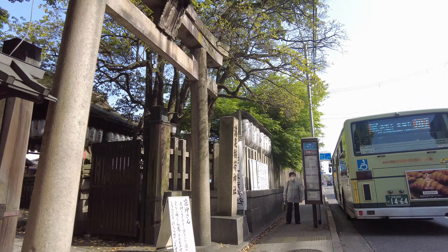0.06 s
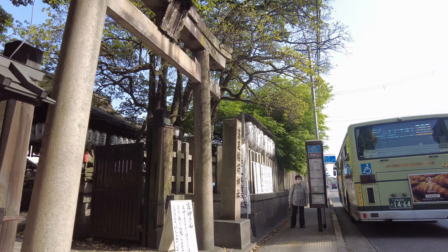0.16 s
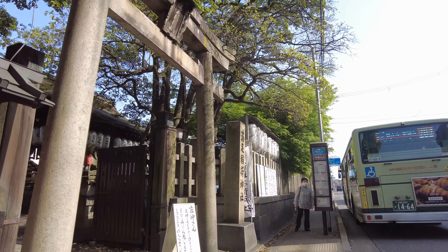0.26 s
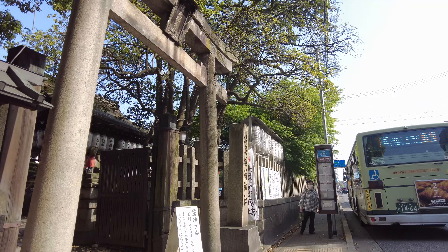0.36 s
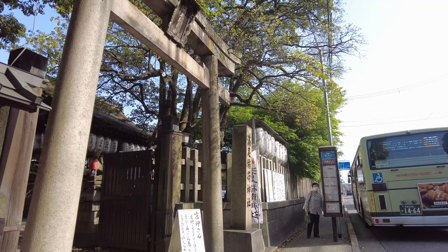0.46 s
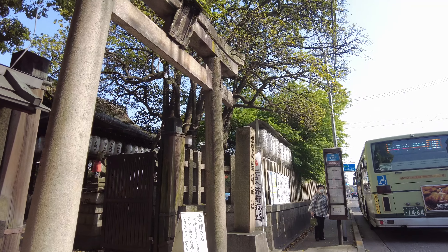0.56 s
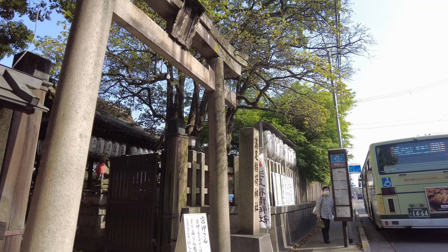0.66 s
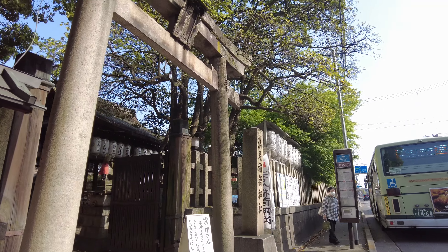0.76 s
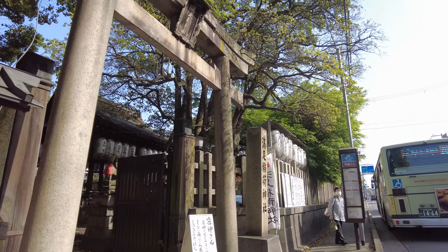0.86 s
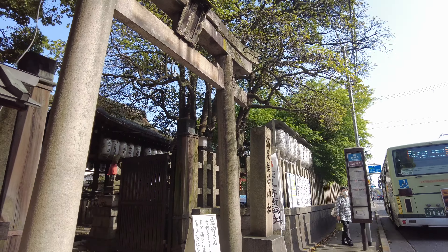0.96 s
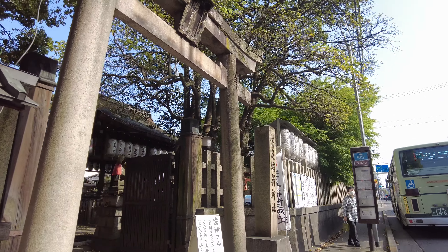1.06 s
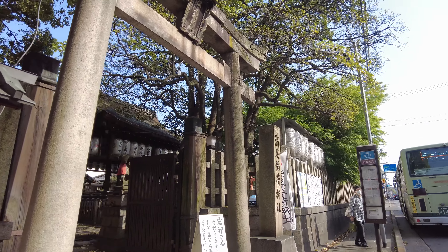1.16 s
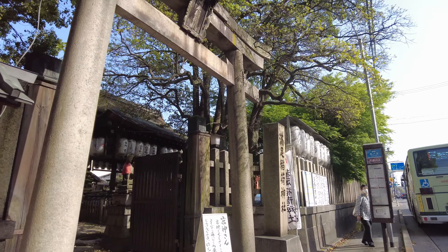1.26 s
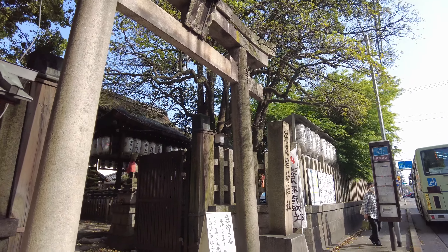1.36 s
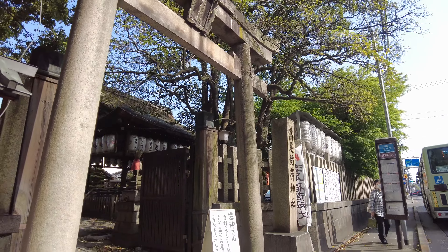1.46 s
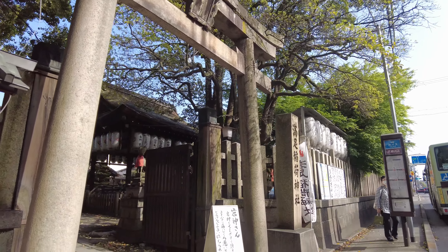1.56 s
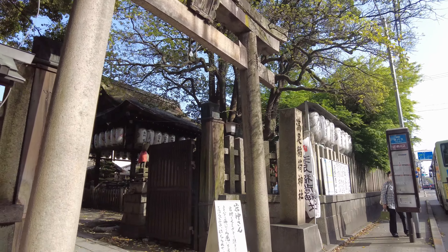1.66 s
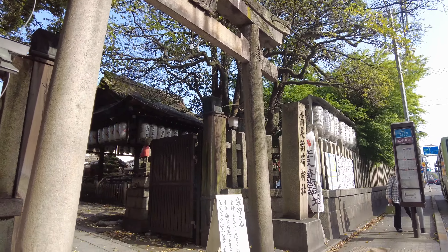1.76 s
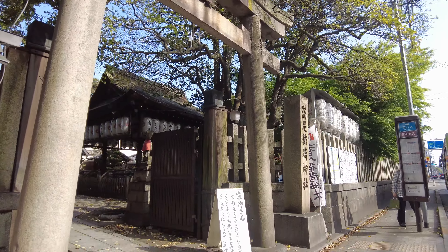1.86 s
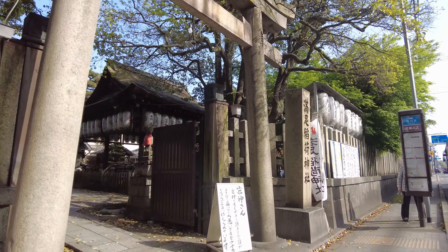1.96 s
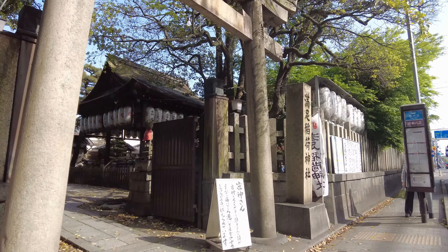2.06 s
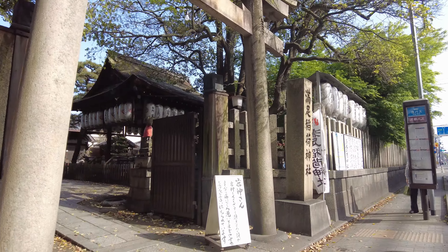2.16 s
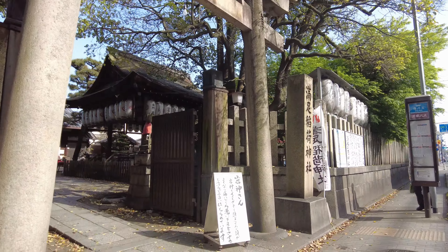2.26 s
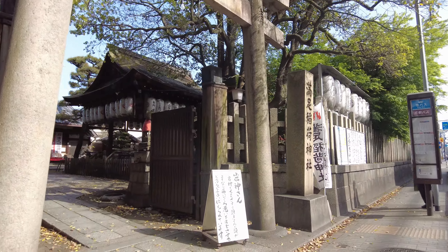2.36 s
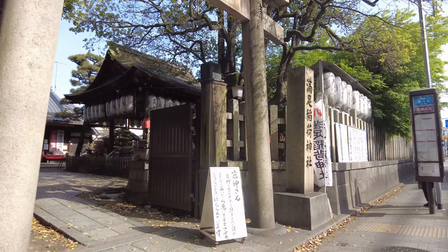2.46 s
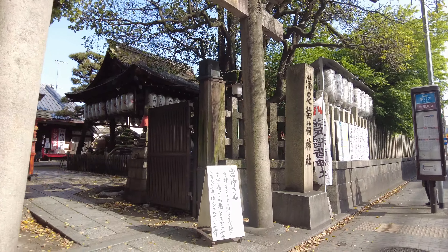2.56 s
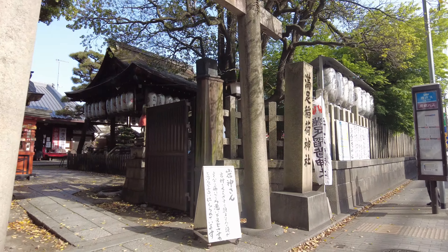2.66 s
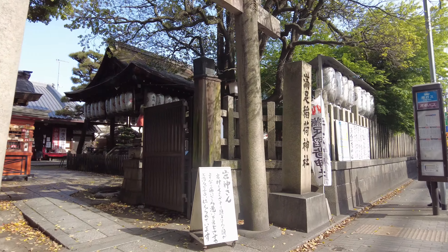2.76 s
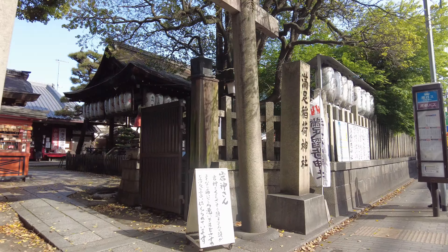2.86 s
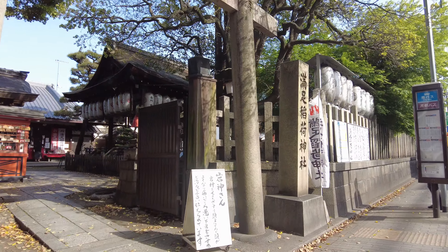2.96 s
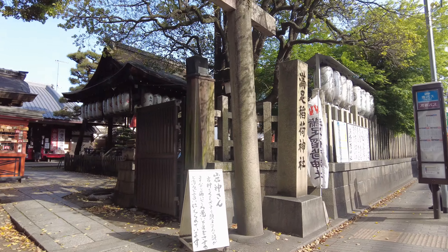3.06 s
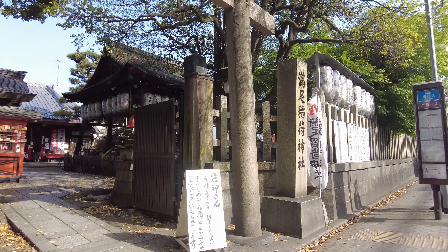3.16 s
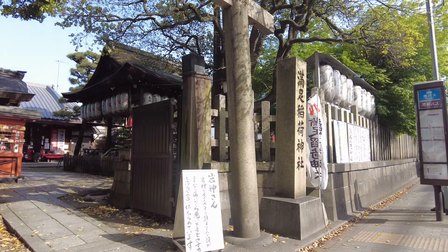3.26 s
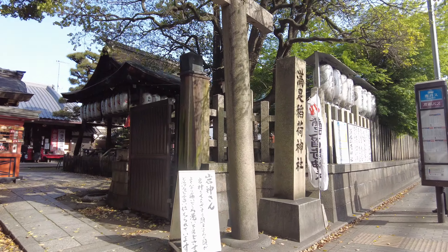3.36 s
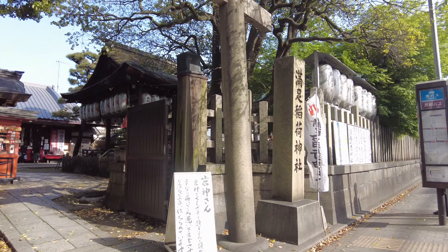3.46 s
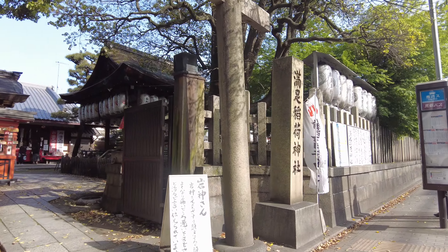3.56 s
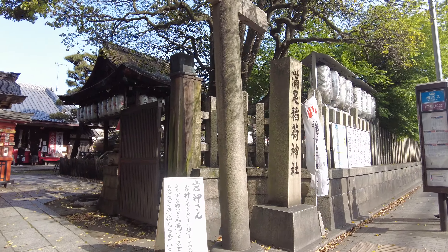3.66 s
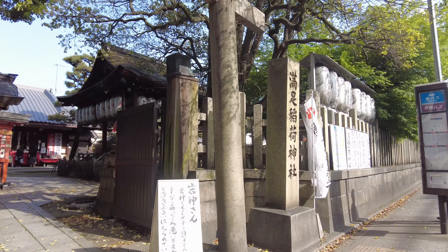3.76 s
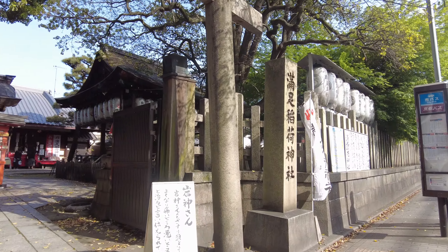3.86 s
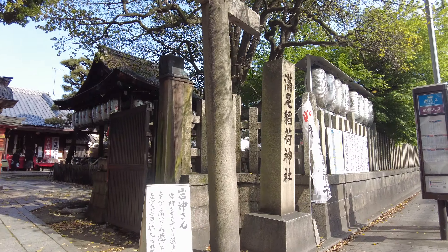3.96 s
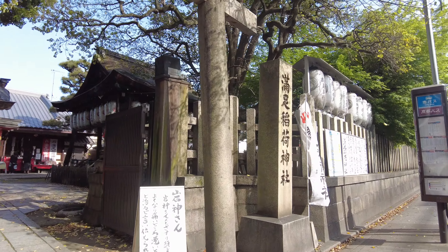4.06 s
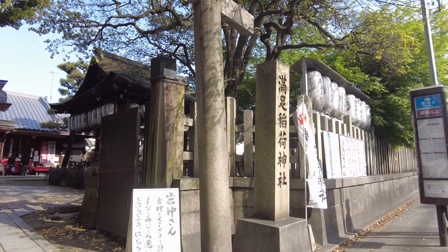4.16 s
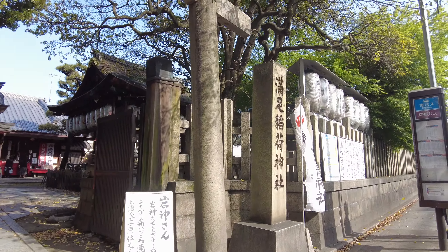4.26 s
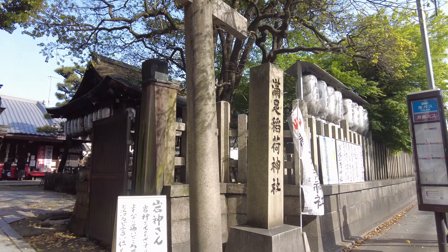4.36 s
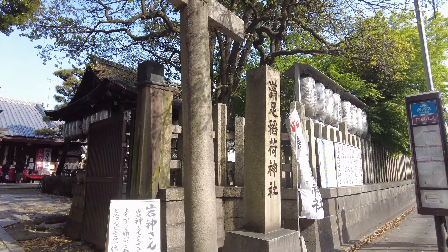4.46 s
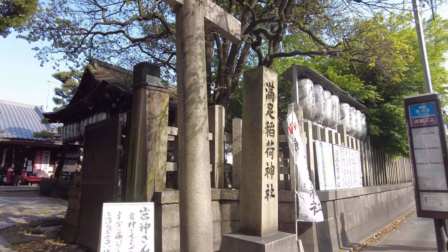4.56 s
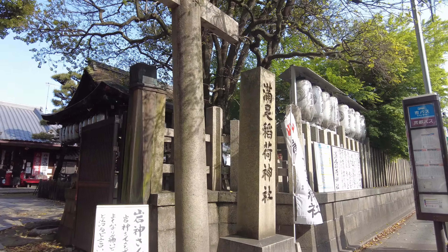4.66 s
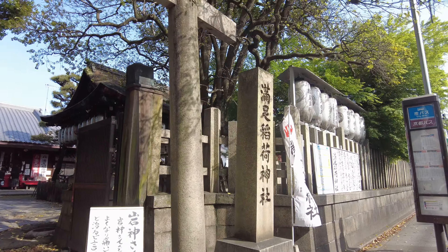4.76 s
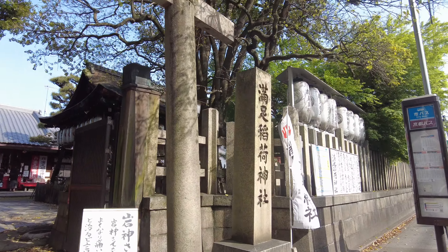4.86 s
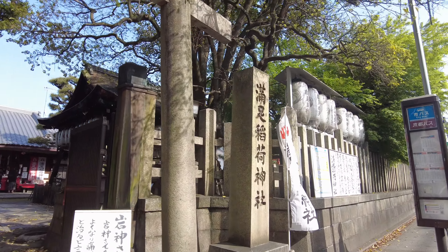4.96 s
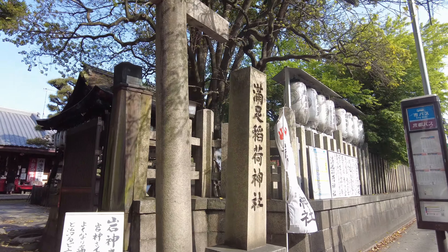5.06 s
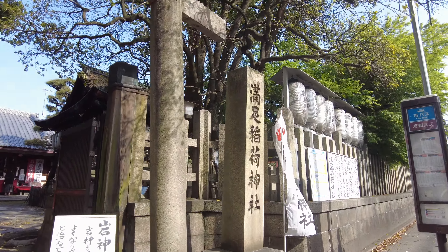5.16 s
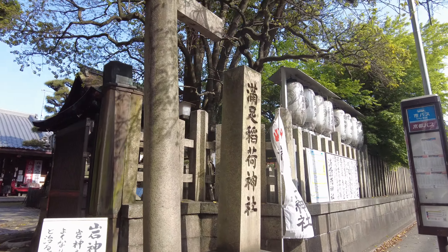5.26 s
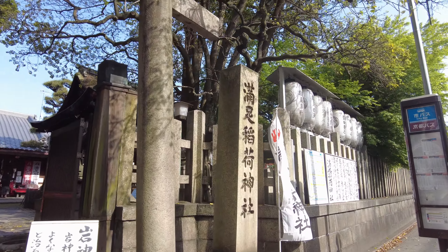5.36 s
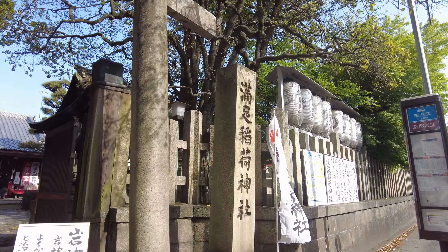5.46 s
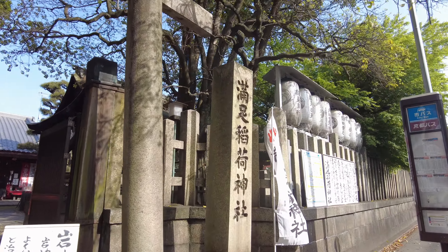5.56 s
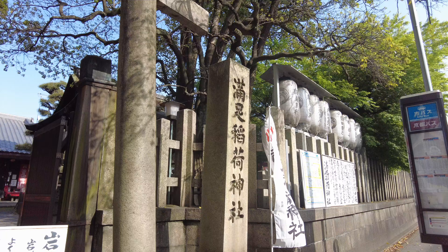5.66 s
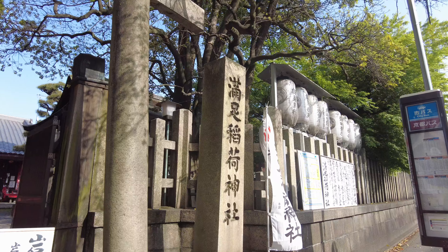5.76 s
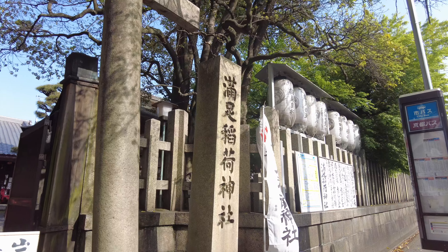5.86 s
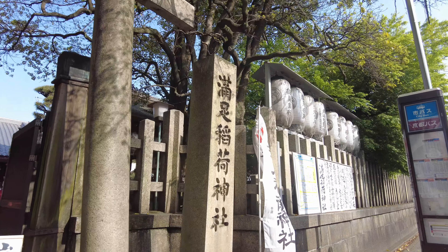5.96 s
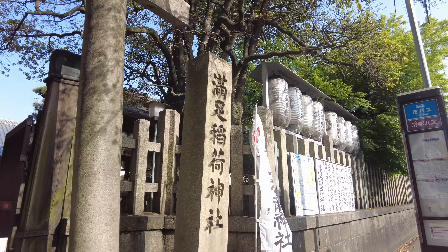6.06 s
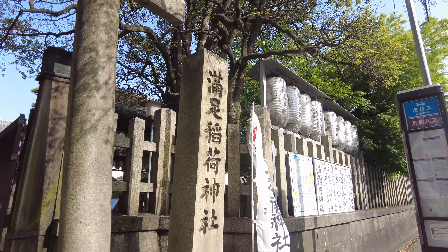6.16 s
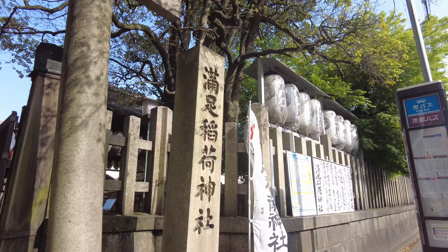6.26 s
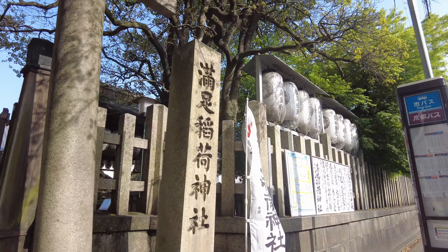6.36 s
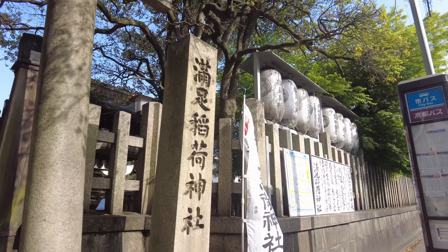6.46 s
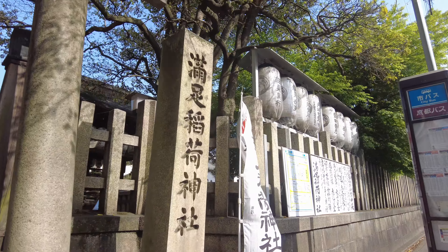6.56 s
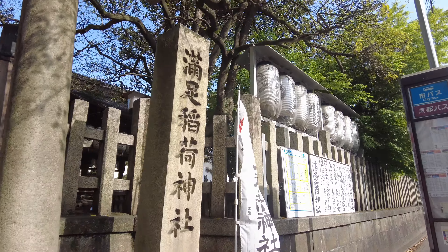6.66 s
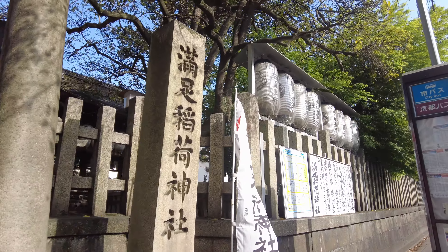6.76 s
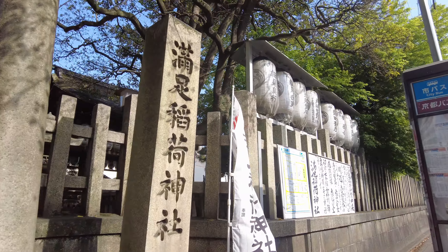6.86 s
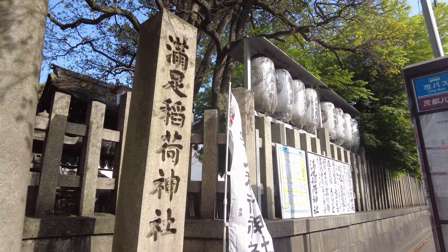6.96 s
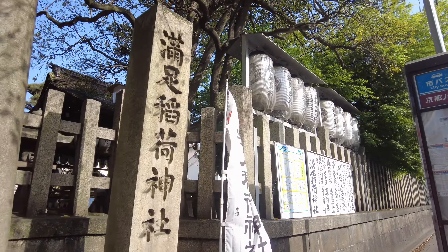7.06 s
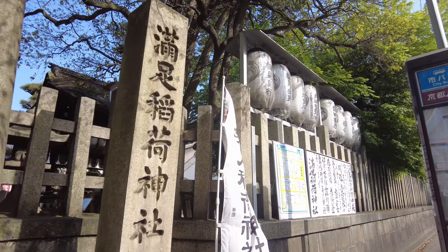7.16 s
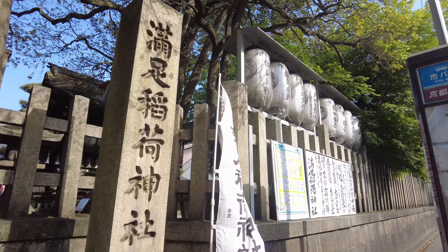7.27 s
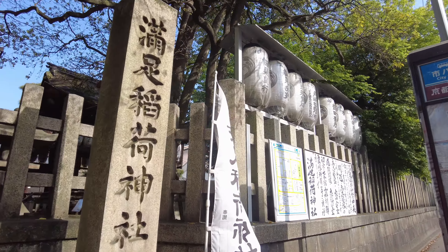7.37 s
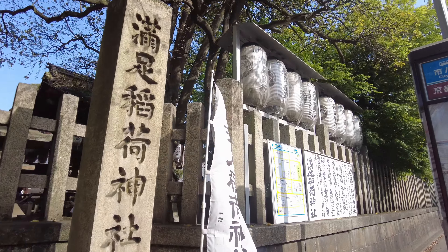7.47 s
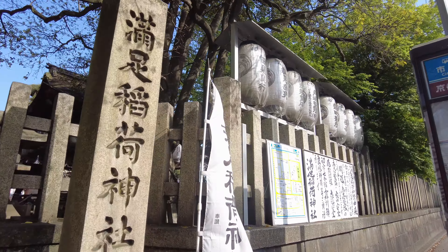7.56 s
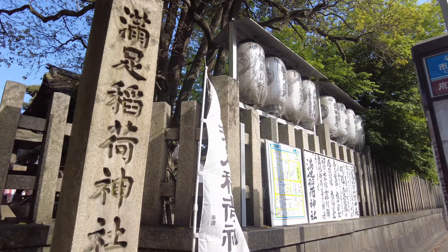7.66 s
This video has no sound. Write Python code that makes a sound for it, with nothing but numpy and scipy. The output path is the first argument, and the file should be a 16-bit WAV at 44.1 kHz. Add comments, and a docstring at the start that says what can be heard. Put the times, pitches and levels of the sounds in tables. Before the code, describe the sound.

A handheld stereo microphone beside a street hears a heavy bus engine leave: low boom, rattling panels and airy fan noise, loudest in the first three seconds. The pitch climbs, drops at the gear change, and further pulls grow more distant. Passing tyres and town hum lie beneath. Early wind puffs bump the microphone; late on, the sound narrows to mono, with small dry ticks nearby.

```python
"""City bus leaving a stop

A diesel bus pulls away, changes gear at about two seconds and recedes up the street.
Firing-rate harmonics boom in the exhaust at each pull; noise bursts at each firing drive body and bay resonances.
Shaped noise makes the fan's rush, the traffic, the puffs of wind, the gear-change hiss and late ticks close by.
After five seconds the stereo picture narrows to mono."""
import sys
import numpy as np
from scipy import signal
from scipy.fft import rfft, irfft
from scipy.io import wavfile
from scipy.ndimage import uniform_filter1d, map_coordinates

SR = 44100
rng = np.random.default_rng(int(sys.argv[2]) if len(sys.argv) > 2 else 0)


def dump_mix(stems):
    """Bounce the given channels to the path in sys.argv[1] as a 16-bit WAV at rate SR."""
    frames = np.atleast_2d(stems).T  # one column per channel
    limited = np.clip(frames, -1, 1)  # hard clip at full scale
    pcm = np.round(limited * 32767).astype(np.int16)
    wavfile.write(sys.argv[1], SR, pcm)


N = 340452
T = np.arange(N) / SR
FREQ = np.maximum(np.arange(N // 2 + 1) * SR / N, 1)
OPPOSED = np.array([[1], [-1]])  # signs of a difference signal in left and right


def undb(db):
    """Logarithmic level: decibels to amplitude gain."""
    return 10 ** (np.asarray(db) / 20)


def curves(table):
    """Linear interpolation in time: each column of a timed table, one value a sample."""
    s, *columns = np.transpose(table)
    return [np.interp(T, s, c) for c in columns]


def by_frequency(table):
    """Interpolation over log frequency: each column of a spectrum table, one value a bin."""
    hz, *columns = np.transpose(table)
    return [np.interp(np.log(FREQ), np.log(hz), c) for c in columns]


def filtered(x, response):
    """Linear filtering: multiply a sound's spectrum by a frequency response."""
    return irfft(rfft(x) * response, N)


def resonance(hz, width_hz):
    """Damped oscillator: complex response with gain 1 at its centre."""
    return 1 / (1 + 1j * (FREQ ** 2 - hz ** 2) / (FREQ * width_hz))


def ring(x, modes):
    """Modal superposition: resonances add in power; each gain is about half one half-width off centre."""
    power = sum(undb(db) ** 2 * abs(resonance(hz, 2 * half_width)) ** 4 for hz, half_width, db in modes)
    return filtered(x, np.sqrt(power))


def noise():
    """Incoherence: two unrelated white noises."""
    return rng.standard_normal((2, N))


def walk(rate):
    """Slow random fluctuation: levels held 1 / rate s and smoothed twice; spread near 1."""
    hold = max(int(SR / rate), 1)
    steps = np.repeat(rng.standard_normal(N // hold + 1), hold)
    return 1.8 * uniform_filter1d(uniform_filter1d(steps, hold), hold)[:N]


def level(x, db):
    """Root-mean-square scaling: set a steady sound to a level."""
    return x * undb(db) / np.sqrt(np.mean(x ** 2))


def step(s, length_s):
    """Sigmoid transition: a smooth rise from 0 to 1 around a moment."""
    return (1 + np.tanh((T - s) / length_s)) / 2


def surges(rows, attack_s):
    """Envelope shaping: sounds rise quickly, swell or sag while held and decay exponentially."""
    gain = np.zeros(N)
    for start, end, db, swell_db, release_s in rows:
        attack = np.clip((T - start) / attack_s, 0, 1)
        held = undb(db + swell_db * (np.clip(T, start, end) - start))
        gain = np.maximum(gain, attack * held * np.exp(-np.maximum(T - end, 0) / release_s))
    return gain


def passes(rows):
    """Inverse-square swell in time: vehicles grow and fade, their powers adding."""
    return np.sqrt(sum((undb(db) / (1 + ((T - s) / half_s) ** 2)) ** 2 for s, db, half_s in rows))


# engine speed: start_s, firing_rate_hz
ENGINE_SPEED = [(0, 71.84), (.25, 71.63), (.9, 76.17), (1.55, 79.93), (1.95, 80.66), (2.2, 73.96),
                (2.85, 71), (3.4, 68.96), (4.35, 69.85), (4.7, 67.62), (4.95, 64.35), (5.6, 64.13),
                (5.9, 68.2), (7.72, 68.65)]


def crankshaft():
    """Phase accumulation: firings counted since the start; the speed trembles a little."""
    return np.cumsum(curves(ENGINE_SPEED)[0] * (1 + .004 * walk(20))) / SR


# how hard the engine works: start_s, load (0-1)
ENGINE_LOAD = [(0, 0.44), (.13, 0.08), (.55, 0.23), (.8, 0.42), (1.08, 0.55), (1.35, 0.4), (1.6, 0.35),
               (1.9, 0.6), (2.2, 0.38), (3.2, 0.39), (3.8, 0.57), (3.96, 0.81), (4.55, 0.94), (4.9, 0.73),
               (5.02, 0.45), (5.5, 0.54), (7.72, 0.4)]
CRUISE_HZ = 73.4  # firing rate at which the parts' speed term is zero


def loaded(part_db):
    """Source strength: a part's level in dB changes with the engine's load and speed."""
    idle_db, rise_db, db_per_hz = part_db
    return idle_db + rise_db * curves(ENGINE_LOAD)[0] + db_per_hz * (curves(ENGINE_SPEED)[0] - CRUISE_HZ)


START_M, ROAD_M_S, ACCEL_M_S2 = 6, 2.69, 0.73  # distance, speed and acceleration of the receding bus
SCREEN_S, SCREEN_LENGTH_S, SCREEN_DB, SCREEN_DB_PER_S = 5.49, 0.31, -5, -2


def nearness():
    """Inverse-distance law: gain relative to the start; a wall along the pavement then screens ever more."""
    distance_m = START_M + ROAD_M_S * T + ACCEL_M_S2 * T ** 2 / 2
    screen_db = SCREEN_DB * step(SCREEN_S, SCREEN_LENGTH_S) + SCREEN_DB_PER_S * np.maximum(T - SCREEN_S, 0)
    return START_M / distance_m * undb(screen_db)


SHIFT_S, SHIFT_LENGTH_S = 1.86, 0.18


def first_gear():
    """Gear engagement: 1 while the bus lugs in first gear, falling smoothly to 0 at the change."""
    return 1 - step(SHIFT_S, SHIFT_LENGTH_S)


def firings(turns, decay=.35, steady=.5, scatter_db=2.5):
    """Pulsed excitation: a decaying burst of gas noise at each firing, every one of its own strength."""
    count = turns.astype(int)
    strength = undb(scatter_db * rng.standard_normal(count[-1] + 1))[count]
    return noise() * (steady + strength * np.exp(-(turns % 1) / decay))


def tone(turns, overtones, waver_db=.5):
    """Harmonic synthesis: a note of rms 1 whose overtones waver in strength and phase."""
    angle = 2 * np.pi * turns
    out = np.cos(angle) * undb(waver_db * walk(24.68))
    for multiple, db in overtones:
        out = out + undb(db + 1.7 * walk(4.8)) * np.cos(multiple * angle + .5 * walk(8.2))
    return level(out, 0)


# lines of unequal cylinders, sweeping through the body's resonances: pitch_hz, line_level_db (relative)
CYLINDER_SPECTRUM = [(24, -2), (48, -7), (61, 1), (80, -6), (98, 1), (135, -3.5), (165, -5), (205, -8.5),
                     (258, -7), (292, -5.5), (315, -12.5), (360, -16.5), (400, -37)]
# all the lines together: unloaded_level_db, full_load_rise_db, speed_rise_db_per_hz
CYLINDER_STRENGTH = (-24, 0.5, 0)
CYLINDERS = 6  # firings in an engine cycle


def cylinders(turns, count=32, waver_db=2.0, drift=0.33):
    """Subharmonic lines: unequal cylinders lope at multiples of the engine cycle, slowly wavering."""
    hz, db = np.transpose(CYLINDER_SPECTRUM)
    cycle_hz = curves(ENGINE_SPEED)[0] / CYLINDERS
    out = np.zeros(N)
    for k in range(2, count):
        if k != CYLINDERS:  # the firing note itself belongs to the exhaust
            line_db = np.interp(k * cycle_hz, hz, db) + waver_db * walk(3.09)
            phase = 2 * np.pi * (k * turns / CYLINDERS + rng.random()) + drift * walk(4.02)
            out += undb(line_db) * np.cos(phase)
    return level(out, loaded(CYLINDER_STRENGTH))


# the road swings to the right: start_s, left_channel_lag_s, exhaust_left_minus_right_db
ROAD_BEARING = [(0, 0.000021, -0.9), (1.2, 0.00011, -2.2), (2.1, 0.000099, 0.5), (5.3, 0.000088, 0.5)]
# the exhaust note above its fundamental: multiple of the firing rate, level_db
NOTE_OVERTONES = [(2, -34), (3, -37.5), (4, -38), (5, -36.5)]
# the throb above its fundamental: multiple of half the firing rate, level_db
HALF_RATE_OVERTONES = [(3, -11.5), (4, -8), (6, -18.5)]
# pulls on the throttle, at the starting distance: start_s, end_s, level_db, swell_db_per_s, release_s
THROTTLE_PULLS = [(-.1, .95, -15, -0.3, 0.34), (.96, 1.68, -13.5, 7.5, 0.22), (1.7, 2.0, -10, -2, 0.11),
                  (2.19, 2.88, -8.5, 0.5, 0.21), (3.46, 4.42, -13, 3.5, 0.34), (4.91, 5.08, -9, 0, 0.047),
                  (5.1, 5.4, -15, -5, 0.56), (5.96, 7.0, -12.5, -2.5, .12)]
# throb and loose rumble: unloaded_level_db, full_load_rise_db, speed_rise_db_per_hz
RUMBLE_STRENGTH = (-25.5, 3.5, -0.85)
PULL_ATTACK_S, COAST_DB = 0.085, -24.5  # the note's lowest level between pulls, before distance
LUG_RUMBLE_DB = 5.5  # extra rumble in first gear


def exhaust(turns):
    """Low-order pulsation: firing note, half-rate throb, cylinder lope and loose rumble, nearly alike in L and R."""
    near = nearness()
    pan_db = curves(ROAD_BEARING)[1]
    boom = np.maximum(surges(THROTTLE_PULLS, PULL_ATTACK_S), undb(COAST_DB))
    waver = undb(0.083 * walk(9.1) / near)  # stronger from afar
    note = tone(turns, NOTE_OVERTONES, waver_db=0.04) * boom * waver
    throb = tone(turns / 2, HALF_RATE_OVERTONES, waver_db=3.0)
    mid, side = level(ring(noise(), [(30.2, 17, -6.0), (52, 24, -5.5)]), 0)
    loose = mid + undb(-19) * side * OPPOSED
    lope = np.clip(near, 0, 1)  # the throb blurs into loose rumble with distance
    rumble_db = loaded(RUMBLE_STRENGTH) + LUG_RUMBLE_DB * first_gear()
    deep = (np.sqrt(lope) * throb + np.sqrt(1 - lope) * loose) * undb(rumble_db)
    return (note + deep + cylinders(turns)) * near * undb(np.array([pan_db, -pan_db]) / 2)


# body panels and exhaust pipe: pitch_hz, half_width_hz, level_db (relative)
BODY_MODES = [(107, 82, 6.5), (137, 12, -4), (221, 160, -8.5), (321, 42, -19)]
# engine block and bay: pitch_hz, half_width_hz, level_db (relative)
BAY_MODES = [(1330, 680, -5.5), (1584, 420, -1.5), (2600, 760, -10.5)]
# broad roar: pitch_hz, half_width_hz, level_db (relative)
ROAR_MODES = [(810, 220, -3.5), (1058, 294, 0.5)]
# strengths at the starting distance: unloaded_level_db, full_load_rise_db, speed_rise_db_per_hz
DRONE_STRENGTH = (-28, 3.5, 0)
CLATTER_STRENGTH = (-38, 10.5, 0.03)
GROWL_STRENGTH = (-45, 12, -0.4)
ROAR_STRENGTH = (-34.5, 12, 0)
# panels buzzing as the engine pulls: start_s, end_s, level_db, swell_db_per_s, release_s
PANEL_BUZZES = [(-.1, .9, -41, -1, .2), (.9, 1.18, -25.5, 0, .15), (1.3, 2.03, -29.5, 1, 0.15),
                (2.35, 2.95, -28, -4.5, .3), (4.15, 4.6, -28, -0.5, 0.19)]
# narrow roar near 1.3 kHz, pulsed at half the firing rate: start_s, end_s, level_db, swell_db_per_s, release_s
NARROW_ROARS = [(-.1, 1.2, -47, -2, 0.19), (2.95, 4, -38, 7, .04), (3.84, 4.93, -28.5, 1, 0.033)]
BUZZ_ATTACK_S, NARROW_ROAR_ATTACK_S = 0.11, 0.069
LUG_GROWL_DB, LUG_DB_PER_HZ = -32, 0.78  # first-gear growl, growing with engine speed
KNOCK, KNOCK_DECAY = 0.41, 0.12  # one cylinder's extra clatter: gain at the start, decay in engine cycles


def engine(turns):
    """Forced resonance: firings excite drone, buzz, growls, clatter, a broad roar and a narrow one."""
    near = nearness()
    drone = ring(firings(turns, decay=0.28, steady=0.63, scatter_db=3.5), BODY_MODES)
    buzz = ring(firings(turns, decay=0.54, steady=0.2, scatter_db=2.5), [(286.5, 25.0, 0)])
    growl = ring(firings(turns, decay=0.91, steady=0.9, scatter_db=6.0), [(362, 63, -0.017), (496, 160, -0.98)])
    lugging = ring(firings(turns, decay=0.72, steady=0.98, scatter_db=0.0), [(528, 164, -0.26), (645, 83, -0.74)])
    knock = 1 + KNOCK * near * np.exp(-(turns / CYLINDERS % 1) / KNOCK_DECAY)  # evens out with distance
    clatter = ring(firings(turns, decay=0.44, steady=4.0, scatter_db=5) * knock, BAY_MODES)
    roar = ring(firings(turns, decay=0.65, steady=2.5, scatter_db=3.5), ROAR_MODES)
    half_rate_bursts = firings(turns / 2, decay=0.45, steady=1.5, scatter_db=2.5)
    narrow_roar = ring(half_rate_bursts, [(1250, 130, 0), (1430, 280, -4)])
    lug_db = LUG_GROWL_DB + LUG_DB_PER_HZ * (curves(ENGINE_SPEED)[0] - CRUISE_HZ)
    out = level(drone, loaded(DRONE_STRENGTH))
    out += level(buzz, 0) * surges(PANEL_BUZZES, BUZZ_ATTACK_S)
    out += level(growl, loaded(GROWL_STRENGTH))
    out += level(lugging, lug_db) * first_gear()
    out += level(roar, loaded(ROAR_STRENGTH))
    out += level(clatter, loaded(CLATTER_STRENGTH) + .5 * walk(6.5))
    out += level(narrow_roar, 0) * surges(NARROW_ROARS, NARROW_ROAR_ATTACK_S)
    return near * out


# spectrum of the fan: pitch_hz, density_db (per Hz, relative)
FAN_SPECTRUM = [(900, 2), (2200, 4), (3000, 0.5), (4100, 3.5), (4800, -2), (6100, -2), (7000, -7),
                (8000, -8), (10300, -12), (11800, -16), (15500, -18.5)]
# level of the rush, distance included, before its top is tilted: start_s, level_db
FAN_RUSH = [(0, -36.5), (.55, -42), (1.2, -41), (1.6, -42), (1.95, -41), (2.3, -43), (3.3, -47),
            (4.65, -48.5), (5.1, -48), (5.45, -55), (6.3, -56.5), (6.9, -60), (7.72, -57.5)]


def fan(dulling=0.47, top_db=2.5):
    """Broadband flow noise: the cooling fan rushes; its top fades faster than the rest as the bus recedes."""
    rush = level(filtered(noise(), undb(by_frequency(FAN_SPECTRUM)[0])), 0)
    top = filtered(rush, 1 / (1 + (9000 / FREQ) ** 6))
    top_gain = undb(top_db) * nearness() ** dulling
    return (rush + top * (top_gain - 1)) * undb(curves(FAN_RUSH)[0])


# spectrum of the town's murmur: pitch_hz, density_db (per Hz, relative)
TOWN_SPECTRUM = [(20, -15), (35, -9), (50, -4), (70, -4.5), (105, 2), (140, -0.5), (200, -1.5), (260, -2),
                 (340, -8), (470, -12.5), (750, -12), (1000, -23), (1350, -15.5), (1650, -23), (2100, -36),
                 (4300, -58), (8000, -72), (15500, -70)]
# spectrum of tyre noise: pitch_hz, density_db (per Hz, relative)
TYRE_SPECTRUM = [(200, -29), (470, -12.5), (650, -2.5), (820, -1.5), (1050, -8), (1400, -9), (1750, -13),
                 (2200, -24), (5000, -62)]
# tyre noise of other cars: peak_s, level_db, half_length_s
TYRE_PASSES = [(.1, -35, 0.17), (2.15, -37, 0.14), (2.6, -40, 0.17), (2.99, -37.5, 0.046),
               (3.57, -36.5, 0.095), (4.0, -41.5, .07), (4.26, -44, 0.053), (4.63, -50, 0.042),
               (5.62, -45.5, 0.17), (6.2, -45, 0.3), (7.3, -51.5, 0.76)]
# another engine humming down the street: peak_s, level_db, half_length_s
HUM_PASSES = [(5.55, -47.5, 0.16), (7.2, -44.5, 0.25)]
# the murmur swells as an engine goes by: peak_s, rise_db, spread_s
ENGINE_SWELL = (6.5, 2.8, 0.56)
TOWN_DB = -38  # murmur before its swells
FAR_HUM_HZ, FAR_HUM_HALF_WIDTH_HZ = 286, 100


def traffic():
    """Incoherent sum of sources: the town's murmur of engines, tyres of cars rolling by and a far hum."""
    town = filtered(noise(), undb(by_frequency(TOWN_SPECTRUM)[0]))
    tyres = filtered(noise(), undb(by_frequency(TYRE_SPECTRUM)[0]))
    hum = ring(noise(), [(FAR_HUM_HZ, FAR_HUM_HALF_WIDTH_HZ, 0)])
    swell_db = .7 * walk(6)
    at_s, rise_db, spread_s = ENGINE_SWELL
    murmur_db = TOWN_DB + rise_db * np.exp(-((T - at_s) / spread_s) ** 2)
    murmur = level(town, murmur_db + swell_db)
    return murmur + level(tyres, swell_db) * passes(TYRE_PASSES) + level(hum, 0) * passes(HUM_PASSES)


def wander(pair, count=40, depth_db=2.0, rate=7., smooth_above_hz=3500, size=2048):
    """Random band modulation: each narrow band sways slowly in level; the hiss stays more even."""
    hz, s, spectra = signal.stft(pair, SR, nperseg=size)
    band = np.interp(np.log(np.maximum(hz, 1)), np.log([150, 9000]), [0, count - 1])
    chance = rng.standard_normal((count, count * 4))
    swell = map_coordinates(chance, np.meshgrid(band, s * rate, indexing="ij"), order=2, mode="mirror")
    depth = depth_db / (1 + (hz[:, None] / smooth_above_hz) ** 2)
    return signal.istft(spectra * undb(depth * swell), SR, nperseg=size)[1][:, :N]


# microphone pair: pitch_hz, bus_likeness (-1..1), traffic_likeness (-1..1), left_minus_right_db
MICROPHONE_PAIR = [(70, 0.57, 1, -0.5), (188, 0.88, 0.86, 1), (323, 0.4, 0.42, 0.5), (525, 0.24, 0.1, 1.5),
                   (824, -0.92, 0.13, .7), (1206, -0.76, 0.1, 0.5), (1228, 1, 0.85, -0.5),
                   (1460, 0.94, 1, -1.4), (2670, 0.43, 0.4, -2.5), (5060, 0.32, 0.3, -1.6),
                   (12000, -0.06, 0.1, -1.2)]
ECHO_S, ECHO_SHARE = 0.000666, 0.05  # delay and gain of the reflection off a hard surface close by


def ports(pair, likeness):
    """Interchannel coherence: mid and side shares set likeness; a reflection combs and the left channel lags."""
    pan_db = by_frequency(MICROPHONE_PAIR)[2]
    likeness = np.clip(likeness, -.999, .999)
    comb = 1 + ECHO_SHARE * np.exp(-2j * np.pi * FREQ * ECHO_S)
    mid, side = rfft(pair) * comb * np.sqrt([(1 + likeness) / 2, (1 - likeness) / 2])
    left, right = irfft([(mid + side) * undb(pan_db / 2), (mid - side) * undb(-pan_db / 2)], N)
    return np.array([np.interp(T - curves(ROAD_BEARING)[0], T, left), right])


# puffs of wind: peak_s, level_db, spread_s
WIND_PUFFS = [(.17, -25, 0.14), (.86, -21, 0.044), (1.095, -17, 0.037), (1.26, -21.5, 0.054),
              (1.59, -22.5, .15), (2.622, -27, 0.18)]
GUST_HZ, GUST_HALF_WIDTH_HZ, GUST_SIDE_DB, GUST_PAN_DB = 31, 19, -6, -0.5


def wind():
    """Turbulent pressure: puffs of air thud on the microphones, slightly more on the right."""
    mid, side = level(ring(noise(), [(GUST_HZ, GUST_HALF_WIDTH_HZ, 0)]), 0)
    puffs = sum(undb(db) * np.exp(-((T - s) / spread_s) ** 2 / 2) for s, db, spread_s in WIND_PUFFS)
    return (mid + undb(GUST_SIDE_DB) * side * OPPOSED) * puffs * undb(GUST_PAN_DB * OPPOSED / 2)


HISS_DB, HISS_HZ, HISS_HALF_WIDTH_HZ, HISS_SPREAD_S = -56, 10500, 4500, 0.11


def shift_hiss():
    """Jet noise: a thin high hiss of air swells and fades around the gear change."""
    air = ring(noise(), [(HISS_HZ, HISS_HALF_WIDTH_HZ, 0)])
    return level(air, HISS_DB) * np.exp(-((T - SHIFT_S) / HISS_SPREAD_S) ** 2 / 2)


# tiny ticks near the microphone: start_s, peak_db, pitch_hz, t60_s
CLOSE_TICKS = [(6.2777, -55, 8500, .015), (6.298, -48, 4970, 0.03), (6.668, -55, 9980, 0.02),
               (6.708, -54, 9490, .03), (6.7688, -37, 10000, 0.004), (7.0215, -56, 6990, 0.041),
               (7.112, -46, 8010, 0.011), (7.211, -39.5, 7160, .02), (7.2158, -45, 6900, .02),
               (7.274, -51, 5500, .05), (7.2835, -55, 9000, .09), (7.3584, -56, 11000, .03)]
TICK_TAIL_DB, TICK_TAIL_T60_S = -23, .13
TICK_BODY_HZ, TICK_BODY_DB = 3900, -2  # the duller knock under each tick
GRIT_FROM_S, GRIT_TO_S = 6.25, 6.72  # fainter ticks fall at random in this span
GRIT_DB, GRIT_HZ, GRIT_T60_S = -59, 9000, 0.02


def ticks(count=26):
    """Impulsive contact: a bright burst over a duller knock, each decaying fast into a faint tail."""
    def band(hz):
        """Band limitation: a band-pass around a centre."""
        return signal.butter(2, [hz * .65, min(hz * 1.4, SR * .45)], "band", fs=SR, output="sos")

    out = np.zeros(N)
    size = SR // 8
    age = np.arange(size) / SR
    grit_s = GRIT_FROM_S + rng.random(count) * (GRIT_TO_S - GRIT_FROM_S)
    grit = [(s, GRIT_DB, GRIT_HZ, GRIT_T60_S) for s in grit_s]
    for s, db, hz, t60 in CLOSE_TICKS + grit:
        fade = undb(-60 * age / t60) + undb(TICK_TAIL_DB - 60 * age / TICK_TAIL_T60_S)
        bright, dull = rng.standard_normal((2, size)) * fade
        knock = undb(TICK_BODY_DB) * signal.sosfilt(band(TICK_BODY_HZ), dull)
        burst = signal.sosfilt(band(hz), bright) + knock
        start = int(s * SR)
        out[start:start + size] += (undb(db) * burst / abs(burst).max())[:N - start]
    return out


def scene():
    """Superposition: bus and traffic at the microphone pair, puffs of wind, and close ticks in the middle."""
    turns = crankshaft()
    bus_likeness, traffic_likeness, _ = by_frequency(MICROPHONE_PAIR)
    bus = ports(wander(engine(turns) + fan() + shift_hiss()), bus_likeness)
    street = ports(wander(traffic()), traffic_likeness)
    return exhaust(turns) + bus + street + wind() + ticks()


MONO_FROM_S, MONO_AT_S, TOP_HZ = 5.31, 5.86, 15700


def record(dry):
    """Channel crossfade, soft saturation and low-pass: right becomes left, peaks round, ends fade, top is cut."""
    share = np.sin(np.pi / 2 * np.interp(T, [MONO_FROM_S, MONO_AT_S], [0, 1])) ** 2
    pair = np.array([dry[0], share * dry[0] + (1 - share) * dry[1]])
    rounded = pair / (1 + (pair / .9) ** 6) ** (1 / 6)
    eased = rounded * np.minimum(np.minimum(T, T[-1] - T) / .008, 1)
    return signal.sosfilt(signal.ellip(10, .2, 80, TOP_HZ, fs=SR, output="sos"), eased)


dry = scene()
out = record(dry)
dump_mix(out)
```